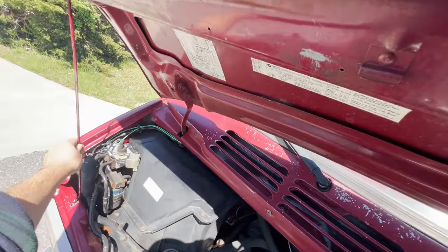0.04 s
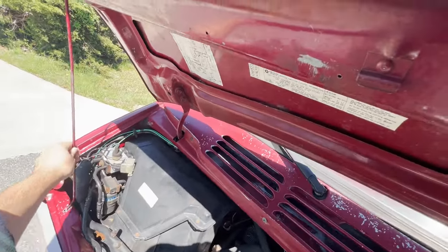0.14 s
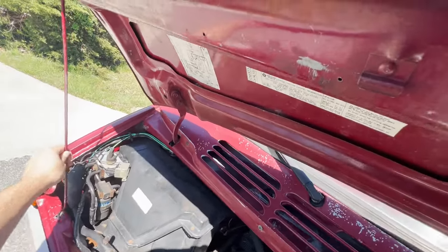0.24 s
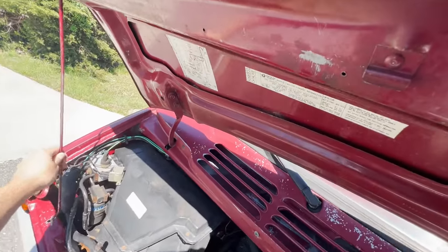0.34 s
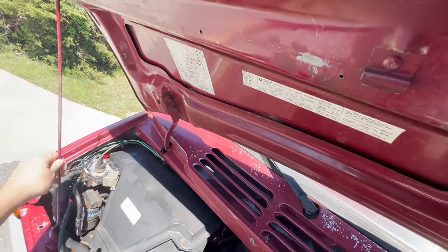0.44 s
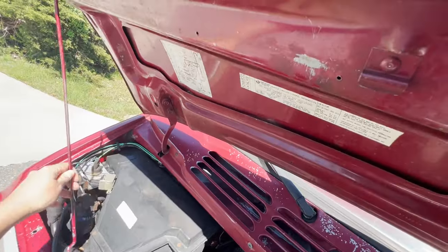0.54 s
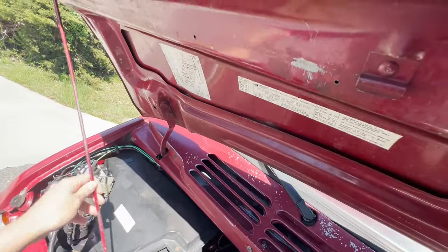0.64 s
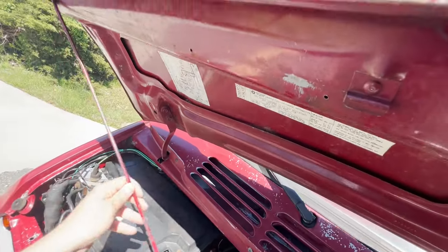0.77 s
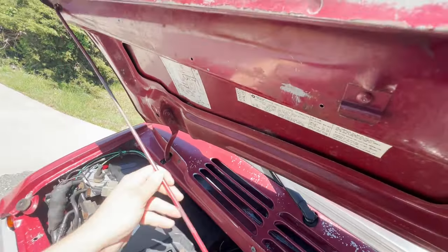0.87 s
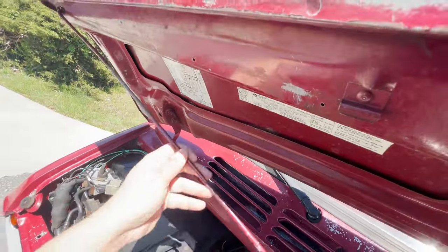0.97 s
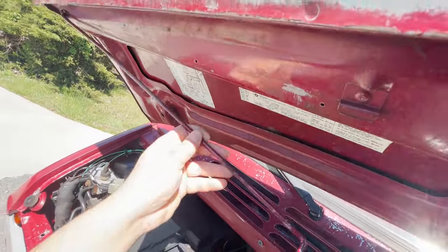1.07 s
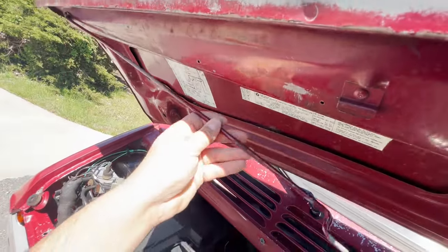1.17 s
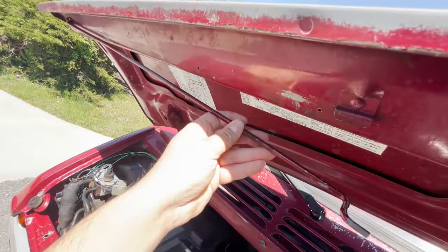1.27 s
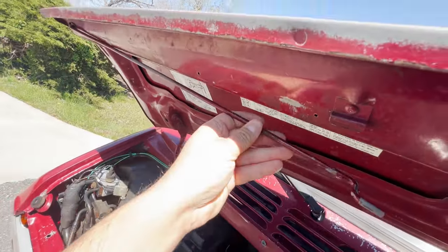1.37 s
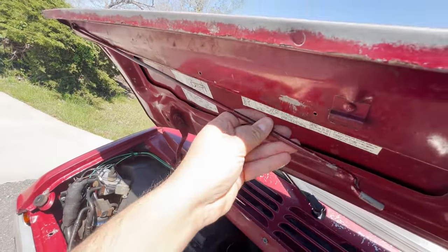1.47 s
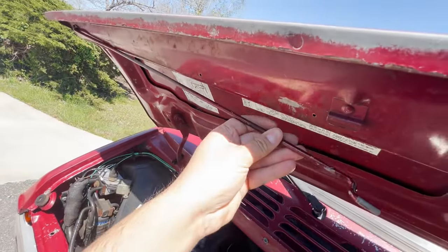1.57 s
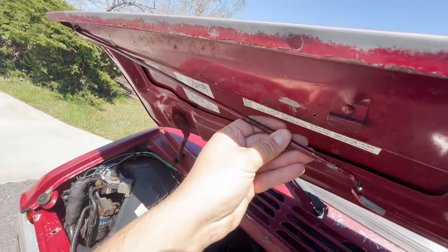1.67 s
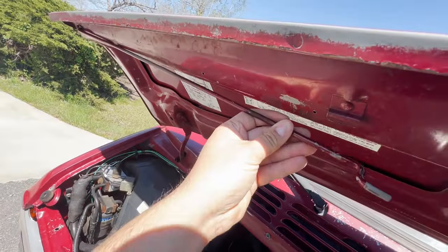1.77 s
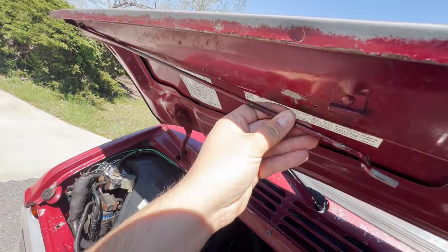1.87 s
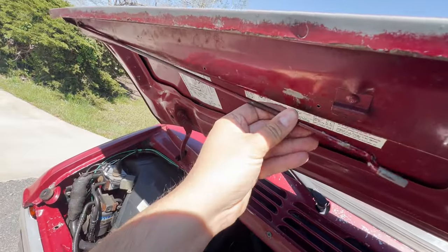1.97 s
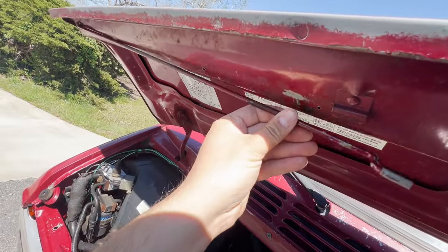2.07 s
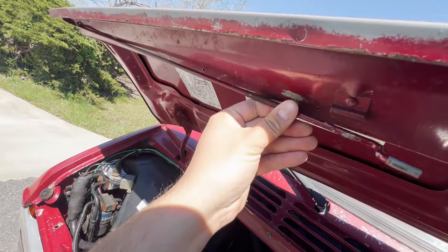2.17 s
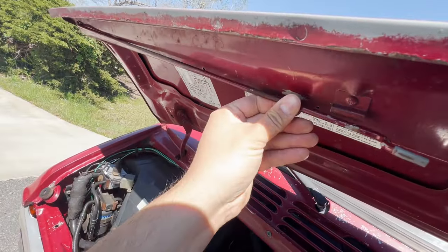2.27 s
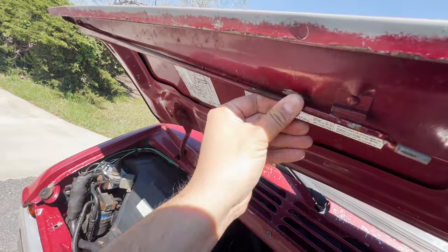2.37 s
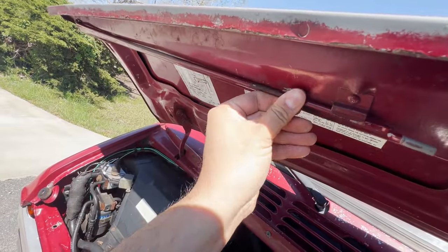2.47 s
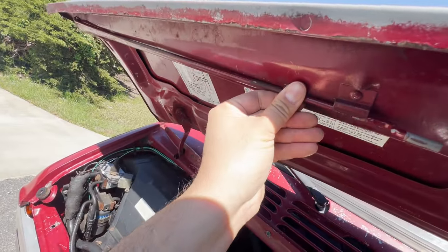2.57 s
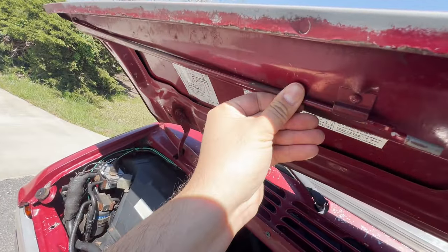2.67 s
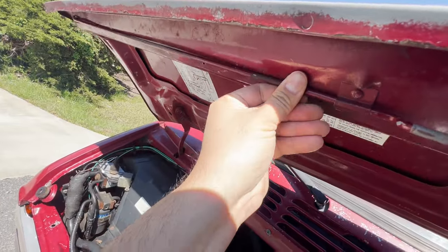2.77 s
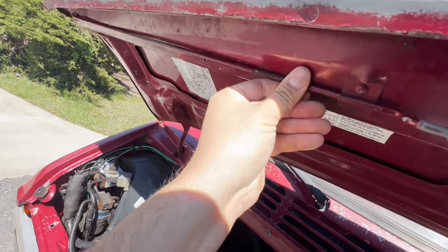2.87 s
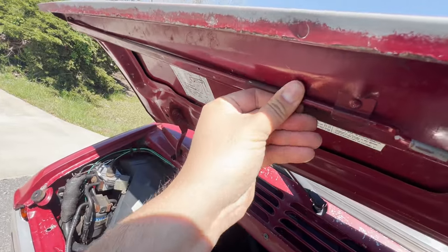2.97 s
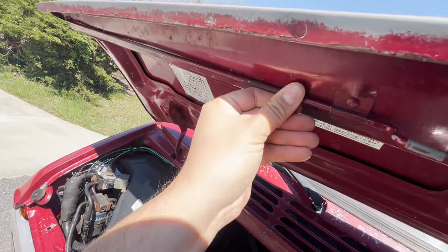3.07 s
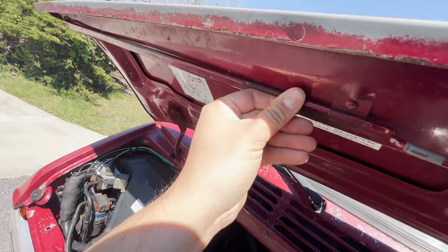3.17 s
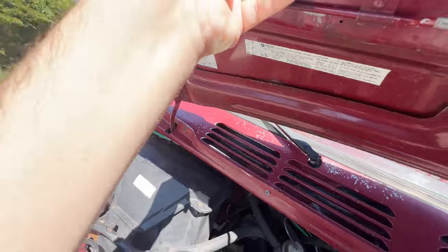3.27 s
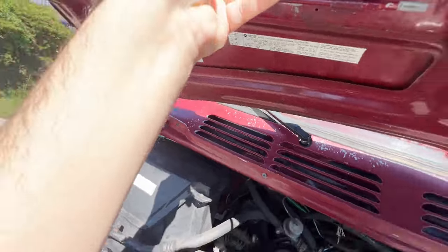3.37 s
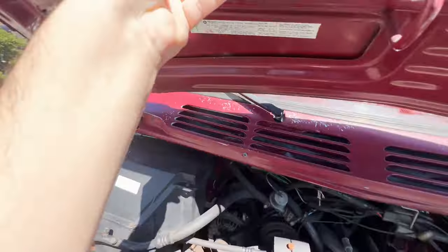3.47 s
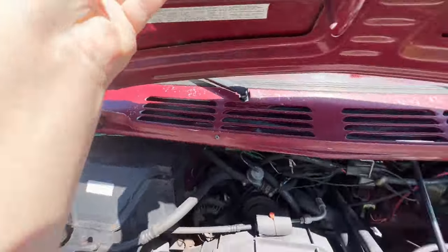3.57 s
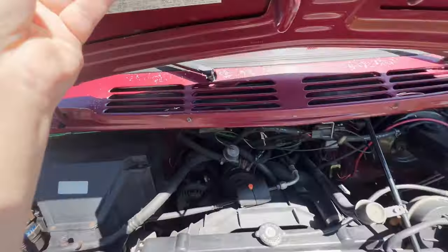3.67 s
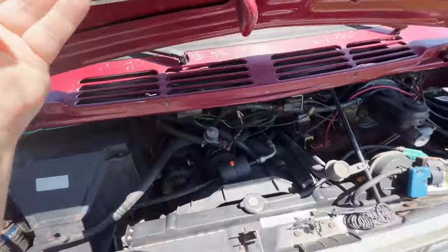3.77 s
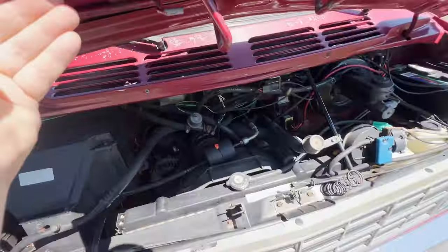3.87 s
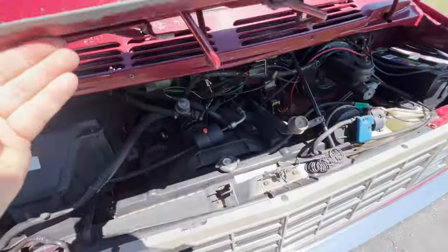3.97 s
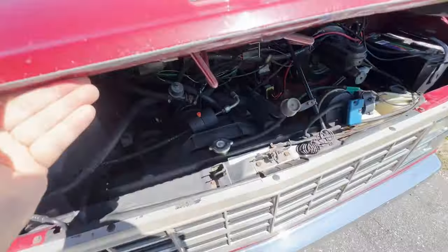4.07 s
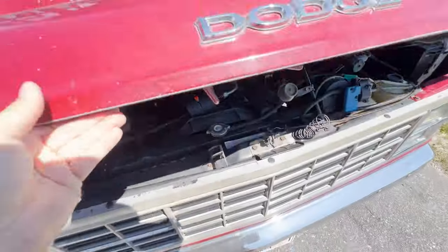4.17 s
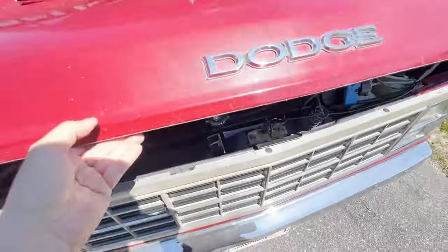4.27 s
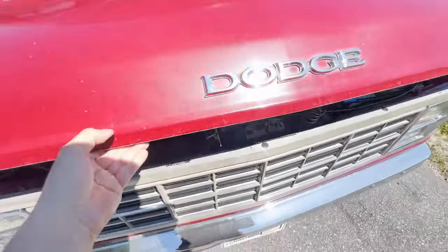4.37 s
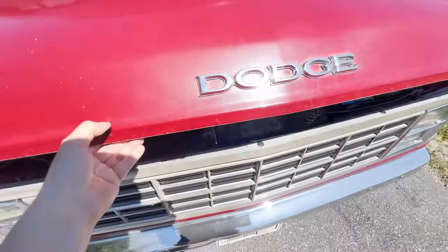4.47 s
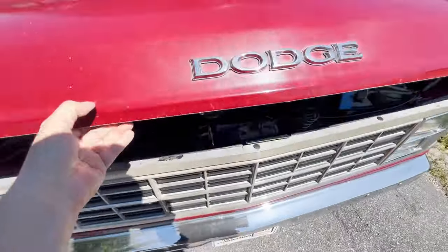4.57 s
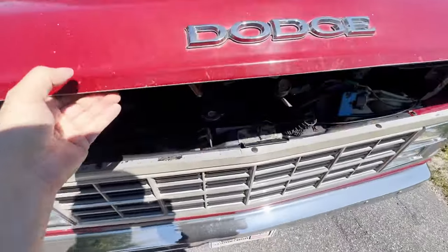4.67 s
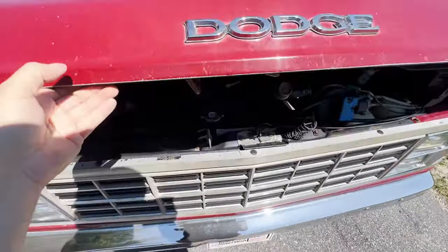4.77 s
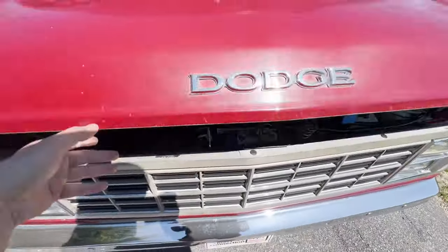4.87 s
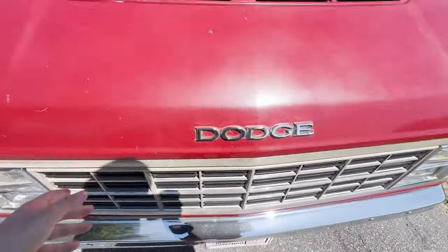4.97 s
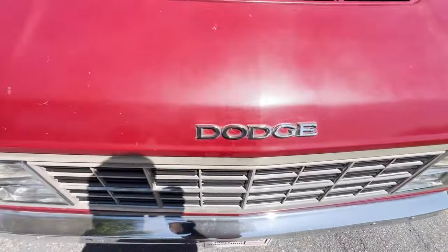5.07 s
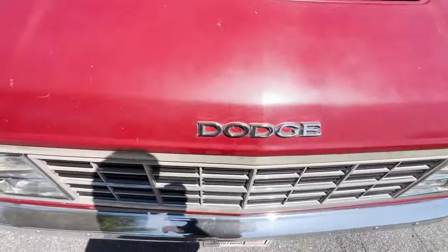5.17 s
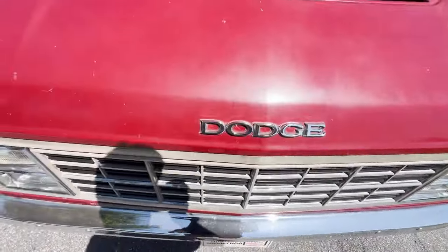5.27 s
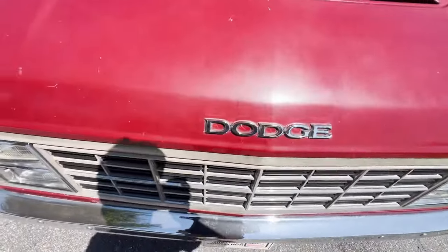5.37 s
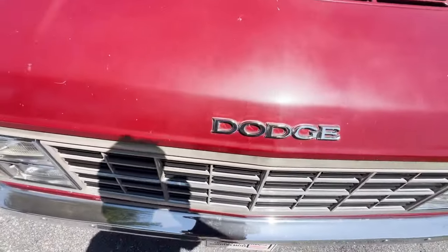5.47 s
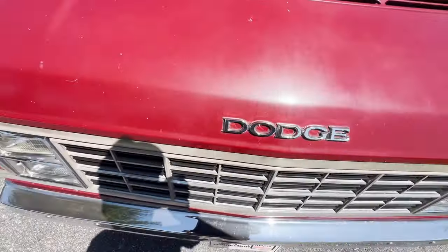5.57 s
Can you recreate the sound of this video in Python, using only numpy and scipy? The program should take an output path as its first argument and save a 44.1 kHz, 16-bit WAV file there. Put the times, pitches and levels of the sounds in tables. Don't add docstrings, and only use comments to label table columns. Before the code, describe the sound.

Close up outdoors, a thin metal rod knocks in small clusters on a raised steel hood, which rings hollowly. It snaps loudly into its holder, the background drops abruptly, faint hinge creaks follow, then the hood slams with a boom and a short latch rattle. Small birds chirp over distant traffic. One close microphone, left channel only.

```python
import sys
import numpy as np
from scipy import signal
from scipy.fft import rfft, irfft
from scipy.io import wavfile
from scipy.ndimage import uniform_filter1d, map_coordinates

SR = 44100
rng = np.random.default_rng(int(sys.argv[2]) if len(sys.argv) > 2 else 0)


def elevation(decibels):
    levels = np.asarray(decibels, float)
    return 10 ** (levels / 20)


def file_out(sig):
    cols = np.atleast_2d(sig).T
    lim = np.clip(cols, -1, 1)
    pcm = np.round(lim * 32767).astype(np.int16)
    wavfile.write(sys.argv[1], SR, pcm)


N = 247842
CHANGE_S = 3.243
HAND_DAMPING_DB = 60

# start_s, peak_db, clank_db, tick_db
ROD_KNOCKS = [(0.001, -34.5, -10.5, -55), (0.233, -35.5, -7.5, -28), (0.271, -33.5, -8, -17),
              (0.281, -27.5, -2, -14.5), (0.306, -31, -9.5, -16.5), (0.319, -29.5, -14, -26),
              (0.344, -32.5, -19.5, -39), (0.775, -24.5, -34.5, -59), (0.799, -39, -38, -50),
              (0.921, -44, -35, -40), (0.989, -42, -16.5, -52), (1.007, -41, -19, -42),
              (1.399, -19.5, -30.5, -44), (1.412, -22.5, -19, -24), (1.429, -27, -21.5, -29),
              (1.443, -22, -22, -22), (1.456, -24.5, -26.5, -32), (1.486, -31, -25, -54),
              (1.753, -46, -36, -30), (1.891, -36.5, -17.5, -35), (1.919, -51, -28, -39),
              (1.958, -46.5, -7, -29), (2.193, -46, -25, -28), (2.358, -50, -10.5, -45),
              (2.426, -48, -1.5, -12.5), (2.469, -25.5, -21.5, -37), (2.489, -29, -19, -18),
              (2.508, -33, -28, -29)]
# start_s, peak_db, clank_db, tick_db
ROD_SNAP = [
    (2.801, -10, -9, -4),
    (2.807, -9, -9, -14.5),
    (2.819, -8, -21, -29),
    (3.088, -53, -25, -39),
]
# start_s, peak_db, clank_db
HINGE_CREAKS = [
    (3.345, -53.5, -22),
    (3.362, -54, -21),
    (3.382, -51, -22),
    (3.43, -48.5, -41),
    (3.492, -52, -26),
    (3.569, -64, -8.5),
    (3.751, -54.5, -26.5),
    (3.924, -57.5, -32),
    (4.329, -60, -13),
]
# pitch_hz, level_db, t60_s
RAISED_MODES = [(290, -10.5, 1.4), (436, -6, 0.9), (477.3, -5, 0.48), (579, -4, 0.8), (640, -14.5, 0.84),
                (717.5, -8, 0.7), (877, -11.5, 0.44), (1030, -18.5, 0.28), (1090, -15.5, 0.3),
                (1140, -24, 0.33), (1180, -12.5, 0.5), (1324, -12.5, 0.5), (1507, -19.5, 0.29),
                (1635, -17, 0.28)]
# pitch_hz, level_db, t60_s
FRAME_MODES = [(118, 2.5, .4), (141, 3.5, .35), (350, -1, .6), (403, -4, .45), (1360, -5.5, .15),
               (1850, -4, .12), (2033, -6, .12), (2236, -2.5, .12), (2800, -1.5, .1), (4140, -3.5, .08),
               (4510, -4, 0.069), (5176, -3.5, .06), (7530, -4, .04)]
# pitch_hz, t60_s
RAISED_DECAY = [(100, 1), (400, .48), (1000, .4), (2000, .22), (4000, 0.12), (8000, .055), (15000, .032)]
# pitch_hz, level_db
RAISED_TONE = [(40, -35.5), (80, -12), (130, 5), (215, -8.5), (320, 3.5), (600, -1.5), (1100, 0.5),
               (1800, -0.5), (3000, 1.5), (5000, 0), (12000, -2.5), (16000, -25)]


def rod():
    damping_db = 48
    early = [(s, db, -42 - 0.73 * db, clank, tick, damping_db) for s, db, clank, tick in ROD_KNOCKS]
    early += [(s, db, -21, clank, tick, damping_db) for s, db, clank, tick in ROD_SNAP]
    late = [(s, db, -8, clank, -33, HAND_DAMPING_DB) for s, db, clank in HINGE_CREAKS]

    def ring(contacts):
        return panel(contacts, RAISED_MODES + FRAME_MODES, RAISED_DECAY, RAISED_TONE, strong_db=-12.5,
                     dense_db=-15.5, spread=.3, late_db=-18, crack=1.3, attack_s=.0011)

    return before_change() * ring(early) + ring(late)


# start_s, peak_db, thud_db, clank_db, tick_db
HOOD_BLOWS = [
    (4.993, -21, -17, -4, -10),
    (4.998, -12, -14, -7, -12),
    (5.025, -7.5, -6, -11, -16),
    (5.032, -9, -4, -3, -22),
    (5.044, -8, -10, -4.5, -19.5),
    (5.061, -6, -14, -14.5, -25),
    (5.074, -5.5, -16, -16.5, -31),
    (5.086, -10.5, -18, -16.5, -30.5),
    (5.099, -14, -16.5, -17.5, -29),
]
# start_s, peak_db
LATCH_BOUNCES = [
    (5.134, -26.5),
    (5.171, -31),
    (5.222, -36.5),
    (5.256, -41),
    (5.269, -40.5),
    (5.313, -41.5),
]
# start_s, level_db
HOOK_CATCHES = [
    (4.995, -23.5),
    (5.002, -25),
]
# pitch_hz, level_db, t60_s
HOOK_MODES = [
    (1158, 3, 0.057),
    (3050, -2.5, .06),
    (5896, -5, 0.026),
]
# pitch_hz, level_db, t60_s
SHUT_MODES = [(91.3, -14, 0.71), (136.8, -11, 0.29), (197.6, -7, 1.4), (341, -6.5, 0.9),
              (392.9, -5.5, 0.52), (524, -9.5, 0.32), (625, -22.5, 1.3), (834, -6, 0.24), (958, -15, 0.33),
              (1040, -6.5, 0.27), (1130, -23, 1.2), (1271, -10.5, 0.23), (1365, -16.5, 0.25),
              (1477, -26, 0.46)]
# pitch_hz, t60_s
SHUT_DECAY = [(100, 0.35), (400, .4), (1000, 0.26), (2000, 0.25), (4000, 0.15), (8000, 0.13),
              (15000, 0.089)]
# pitch_hz, level_db
SHUT_TONE = [(40, -16.5), (85, 5.5), (140, -3), (200, 10.5), (300, 2.5), (450, 2), (800, -1), (1500, 1.5),
             (4000, 6), (7000, 4), (12000, -1), (16000, -18.5)]


def slam():
    out = np.zeros(N + SR)
    t = np.arange(SR // 10) / SR
    chinks = [(s, db, 2.5) for s, db in HOOK_CATCHES]
    chinks += [(s, db - 17, -9.5) for s, db in LATCH_BOUNCES]
    for s, db, top_db in chinks:
        strengths = elevation(rng.normal(0, 1.8, len(HOOK_MODES)) + [0, 0, top_db])
        out[round(s * SR):][:len(t)] += elevation(db) * ringing(HOOK_MODES, strengths, t)
    contacts = [(*blow, HAND_DAMPING_DB) for blow in HOOD_BLOWS]
    contacts += [(*bounce, -3.5, -16, -30, HAND_DAMPING_DB) for bounce in LATCH_BOUNCES]
    return out[:N] + panel(contacts, SHUT_MODES, SHUT_DECAY, SHUT_TONE, strong_db=-13,
                           dense_db=-16.5, spread=.3, late_db=-18.5, crack=1.5, attack_s=.0012)


def panel(contacts, strong, t60s, colour, strong_db, dense_db, spread, late_db, crack, attack_s):
    s, db, thud_db, clank_db, tick_db, damping_db = np.transpose(contacts)
    t = np.arange(SR * 6 // 10) / SR

    def tone_db(hz):
        return np.array([along([(130, thud), (550, 0), (2500, clank), (8500, tick)], hz)
                         for thud, clank, tick in zip(thud_db, clank_db, tick_db)])

    noise = rng.standard_normal((len(s), len(t)))
    hz, frames, z = signal.stft(noise, SR, nperseg=1024, noverlap=768)
    t60 = along(t60s, hz) * np.exp(spread * rng.uniform(-0.46, 1, (len(s), len(hz))))
    fall_db = -60 * frames / t60[..., None]
    decay = elevation(fall_db) + elevation(late_db + fall_db / 2.2)
    gain = elevation(tone_db(hz) + along(colour, hz) + dense_db) * np.sqrt(SR / (hz + 60))
    dense = signal.istft(z * gain[..., None] * decay, SR, nperseg=1024, noverlap=768)[1]

    modes_hz = np.transpose(strong)[0]
    size = (len(s), len(modes_hz))
    strengths = elevation(tone_db(modes_hz) + strong_db + rng.normal(0, 2.7, size))
    rings = ringing(strong, strengths * rng.choice([-1, 1], size), t)

    shape = elevation(db[:, None] - np.outer(np.abs(damping_db), t)) * (1 - np.exp(-t / attack_s))
    shape = shape * (1 + crack * np.exp(-t / 0.0094))
    out = np.zeros(N + SR)
    for start, blow in zip(s, shape * (dense[:, :len(t)] + rings)):
        out[round(start * SR):][:len(t)] += blow
    return signal.sosfilt(signal.butter(4, 62, "high", fs=SR, output="sos"), out[:N])


def ringing(modes, strengths, t):
    hz, db, t60 = np.transpose(modes)[:, :, None]
    return strengths @ (elevation(db - 60 * t / t60) * np.sin(2 * np.pi * hz * t))


# start_s, level_db
GRIP = [(0.0, -52), (0.23, -54.5), (0.44, -52.5), (0.55, -64.5), (0.8, -59), (0.95, -55.5), (1.1, -62.5),
        (1.35, -72.5), (1.56, -56.5), (2.07, -64), (2.22, -60.5), (2.6, -63.5), (3.23, -67.5), (3.26, -78),
        (3.4, -66), (3.65, -74.5), (5.0, -81.5), (5.62, -73)]
# pitch_hz, level_db per Hz
MURMUR_TONE = [(120, -30), (190, -10), (310, -2.5), (398, 0), (620, -7.5), (869, -13.5), (1180, -24),
               (2300, -33), (2500, -35), (3250, -65), (5500, -120)]
# pitch_hz, level_db per Hz
RUSTLE_TONE = [(500, -20), (900, 1.5), (1500, -1), (3000, -8.5), (6000, -13.5), (10000, -21.5),
               (16000, -34.5)]


def handling():
    grip_db = np.interp(np.arange(N) / SR, *np.transpose(GRIP))
    murmur = elevation(grip_db) + after_ring(layer=0)
    murmur = murmur * elevation(2.0 * wobble(27)) * rush(MURMUR_TONE, patchy_db=3.5)
    rustle = elevation(-80 + 0.66 * (grip_db + 65)) + elevation(-4.5) * after_ring(layer=1)
    return murmur + rustle * elevation(1.7 * wobble(60)) * rush(RUSTLE_TONE, patchy_db=2.5)


# start_s, murmur_db, rustle_db, boom_db
HEAVY_BLOWS = [
    (2.82, -42.5, -80, -60),
    (5.06, -43, -64.5, -52),
]


def after_ring(layer):
    rise_s, fall_db = .05, (60.5, 40, 30)[layer]
    s = np.transpose(HEAVY_BLOWS)[0][:, None]
    since = np.maximum(np.arange(N) / SR - s, 0)
    swell = (1 - np.exp(-since / rise_s)) ** 2 * elevation(-fall_db * since)
    heard = np.where(s < CHANGE_S, before_change(), 1)
    return elevation(np.transpose(HEAVY_BLOWS)[1 + layer]) @ (swell * heard)


# start_s, length_s, centre_hz, width_hz, level_db
SCUFF_SWELLS = [(.15, 0.067, 2500, 504, -70.5), (.88, 0.061, 5500, 4000, -78),
                (2.113, 0.11, 3000, 3500, -76), (2.431, 0.053, 2500, 3500, -59.5),
                (2.499, .09, 1500, 1500, -66), (0.244, 0.045, 1200, 2500, -50),
                (2.767, 0.036, 4400, 300, -66.5), (2.785, 0.019, 900, 900, -47),
                (4.32, .055, 3010, 3000, -76.5), (4.36, .12, 1547, 350, -81), (4.679, 0.12, 1540, 300, -77),
                (4.7, .12, 2900, 1500, -85), (4.871, .03, 2102, 900, -79)]


def scuffs():
    out = np.zeros(N)
    for s, length, centre_hz, width_hz, db in SCUFF_SWELLS:
        u = np.linspace(0, 1, int(length * SR))
        hz = np.fft.rfftfreq(len(u), 1 / SR)
        resonance = 1 / (1 + (2 * (hz - centre_hz) / width_hz) ** 2)
        band = irfft(rfft(rng.standard_normal(len(u))) * resonance, len(u))
        out[round(s * SR):][:len(u)] += elevation(db) * np.sin(np.pi * u ** 1.6) * unit(band)
    return out


# start_s, length_s, pitch_hz, level_db
FALLING_CHIRPS = [(0.447, 0.024, 3330, -68.5), (0.877, .03, 3200, -68), (1.241, 0.039, 3220, -68),
                  (1.601, 0.03, 3380, -70), (1.947, .016, 3250, -65), (2.295, 0.028, 3200, -63.5),
                  (2.765, 0.035, 3150, -62), (3.185, .03, 2940, -71), (4.196, 0.031, 2750, -70),
                  (4.211, 0.032, 3450, -77), (4.578, 0.017, 3320, -74.5), (4.61, .014, 3350, -77),
                  (4.956, 0.039, 2660, -75), (5.571, .016, 2300, -75.5)]
# start_s, pitch_hz, level_db
RISING_ANSWERS = [
    (.555, 1950, -68),
    (1.345, 1900, -69),
    (1.695, 1800, -68),
    (2.044, 1850, -64.5),
    (5.486, 2560, -69),
]
# start_s, pitch_hz, level_db
LEVEL_PEEPS = [(.64, 5600, -71), (.69, 4850, -75), (.717, 4620, -79), (.79, 4450, -74), (1.0, 4480, -77),
               (2.72, 3270, -66), (2.742, 3100, -67), (5.59, 2012, -72.5), (3.12, 1980, -74),
               (3.72, 2570, -80), (4.11, 2500, -83), (4.752, 2370, -78), (4.86, 3650, -77.5),
               (4.885, 3660, -77), (4.89, 2900, -69), (4.923, 2845, -74.5), (5.52, 2870, -72),
               (5.551, 2790, -74)]
# start_s, pitch_hz, level_db
SWOOPS = [
    (4.795, 2300, -73.5),
    (5.378, 2250, -73),
]


def birds():
    out = np.zeros(N + SR)
    notes = []
    for s, length, hz, db in FALLING_CHIRPS:
        drop_hz = 22000 * length
        notes.append((s, length, hz, hz - drop_hz * .45, hz - drop_hz, db))
    for rows, length, middle, end in [(RISING_ANSWERS, .019, 1.07, 1.13), (LEVEL_PEEPS, .026, .97, .96),
                                      (SWOOPS, .08, .84, 1)]:
        notes += [(s, length, hz, hz * middle, hz * end, db) for s, hz, db in rows]
    for s, length, start_hz, mid_hz, end_hz, db in notes:
        u = np.linspace(0, 1, int(length * SR))
        hz = np.polyval(np.polyfit([0, .5, 1], [start_hz, mid_hz, end_hz], 2), u)
        flutter_db = 2.2 * rng.standard_normal(8)[(u * 7).astype(int)]
        breath = elevation(db - 5.5 + flutter_db) * np.sin(np.pi * u) ** 0.44
        out[round(s * SR):][:len(u)] += breath * np.sin(2 * np.pi * np.cumsum(hz) / SR)
    t = np.arange(SR // 5) / SR
    trees = rng.standard_normal(len(t)) * elevation(-60 * t / .15)
    return out[:N] + elevation(-3.5) * signal.fftconvolve(out, trees / np.linalg.norm(trees))[:N]


# pitch_hz, level_db rms
ENGINE_HUM = [
    (86.4, -60.5),
    (173.5, -68),
    (112, -67.5),
]
# pitch_hz, level_db per Hz
RUMBLE_TONE = [(12, -56.5), (20, -25.5), (49, 1), (97, -4), (245, -10), (269, -21.5), (300, -8.5),
               (449, -18.5), (500, -16), (650, -45.5), (1100, -120)]
# pitch_hz, level_db per Hz
HISS_TONE = [(290, -31), (500, -1), (659, -1), (1500, -12), (3290, -27.5), (3650, -29), (14000, -32.5),
             (16000, -35)]


def traffic():
    t = np.arange(N) / SR
    hum = np.zeros(N)
    for hz, db in ENGINE_HUM:
        drift = 1.1 * wobble(11)
        hum += elevation(db + 1.8 * wobble(14)) * np.sqrt(2) * np.sin(2 * np.pi * hz * t + drift)
    rumble = elevation(background_db(-66.5, -70.5) + 0.79 * wobble(2.5)) + after_ring(layer=2)
    rumble = rumble * rush(RUMBLE_TONE, patchy_db=1.0)
    hiss = elevation(background_db(-71, -78.5)) * rush(HISS_TONE, patchy_db=1.36)
    microphone = elevation(background_db(-82.5, -88)) * rng.standard_normal(N)
    return before_change() * hum + rumble + hiss + microphone


def before_change():
    return np.clip((CHANGE_S - np.arange(N) / SR) * 100, 0, 1)


def background_db(before, after):
    first = before_change()
    return before * first + after * (1 - first)


def rush(spectrum, patchy_db):
    z = signal.stft(rng.standard_normal(N), nperseg=512)[2]
    patches = uniform_filter1d(rng.standard_normal(z.shape), size=5, axis=0)
    patches = uniform_filter1d(patches, size=8, axis=1)
    x = signal.istft(z * elevation(patchy_db * unit(patches)), nperseg=512)[1][:N]
    colour = elevation(along(spectrum, np.fft.rfftfreq(N, 1 / SR)))
    return unit(irfft(rfft(x) * colour, N))


def wobble(rate):
    knots = rng.standard_normal(int(N * rate / SR) + 4)
    return map_coordinates(knots, [np.arange(N) * rate / SR])


def along(points, hz):
    f, v = np.transpose(points)
    return np.interp(np.log(hz + 1), np.log(f + 1), v)


def unit(x):
    return x / np.sqrt(np.mean(x ** 2) + 1e-20)


def scene():
    sound = rod() + slam() + handling() + scuffs() + birds() + traffic()
    return np.array([elevation(6.02) * sound, np.zeros(N)])


def top_cut(x):
    return signal.sosfilt(signal.butter(12, 15700, fs=SR, output="sos"), x)


def record(dry):
    top, hardness = .93, 4.5
    mix = dry / (1 + np.abs(dry / top) ** hardness) ** (1 / hardness)
    return top_cut(mix)


dry = scene()
out = record(dry)
file_out(out)
```